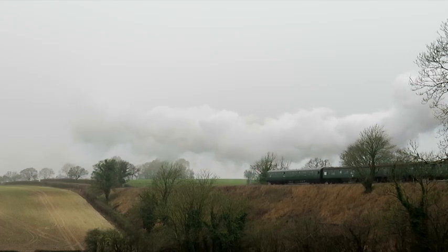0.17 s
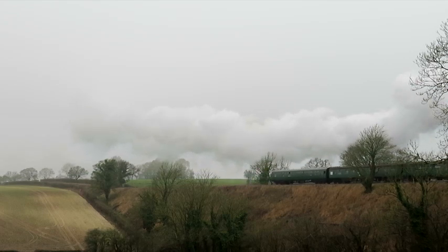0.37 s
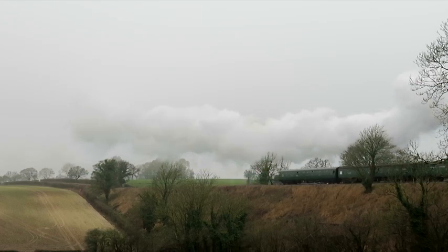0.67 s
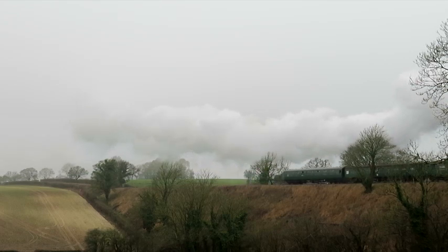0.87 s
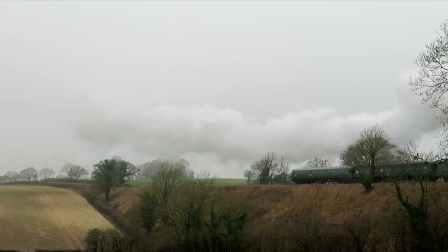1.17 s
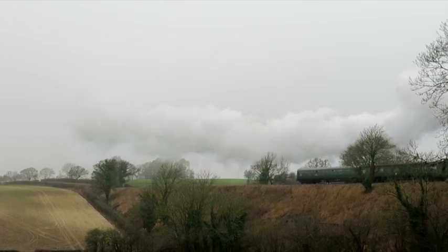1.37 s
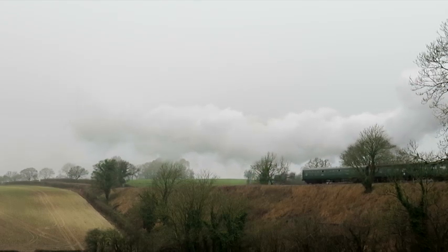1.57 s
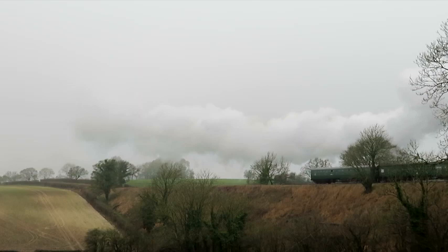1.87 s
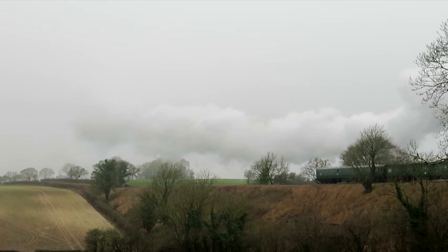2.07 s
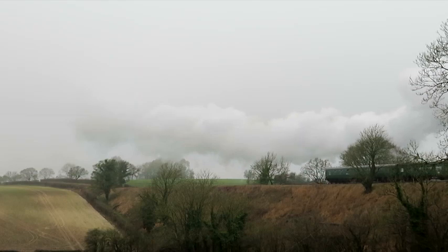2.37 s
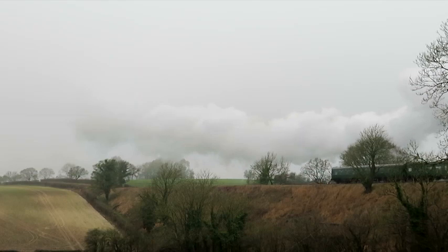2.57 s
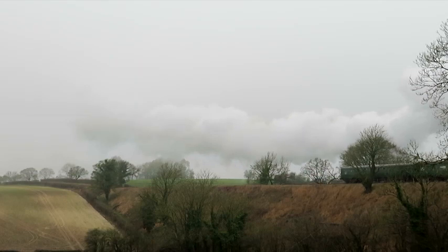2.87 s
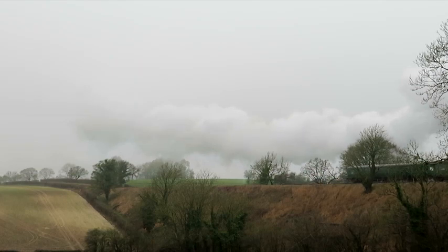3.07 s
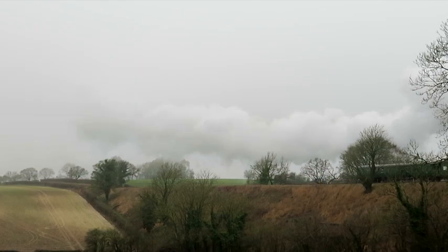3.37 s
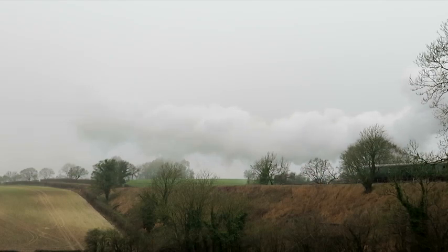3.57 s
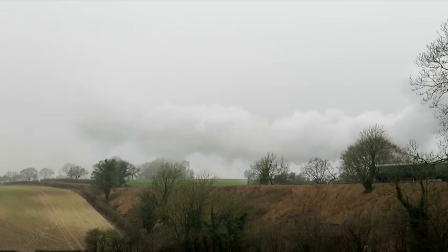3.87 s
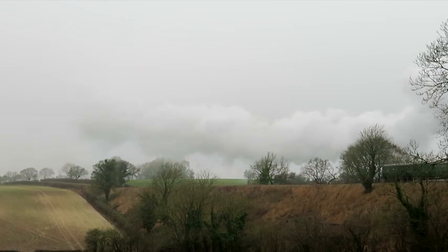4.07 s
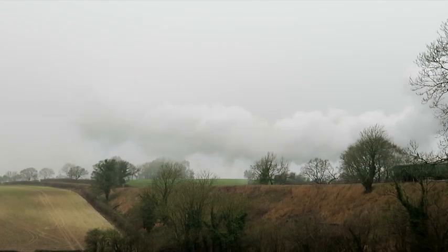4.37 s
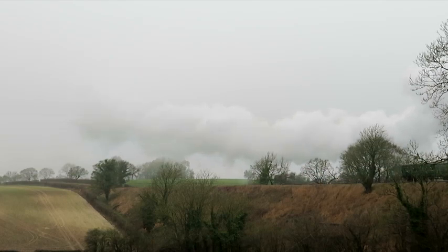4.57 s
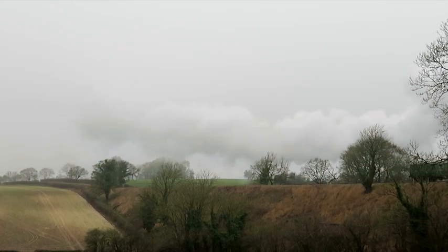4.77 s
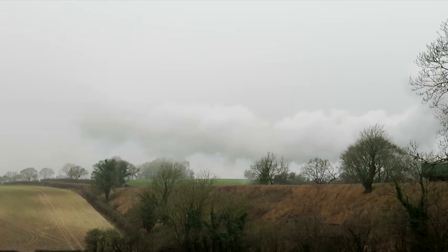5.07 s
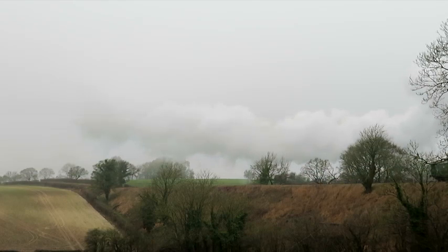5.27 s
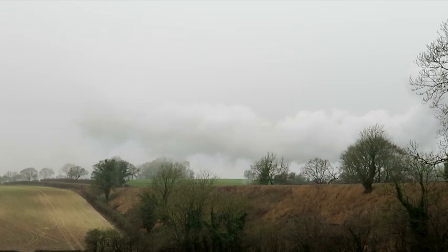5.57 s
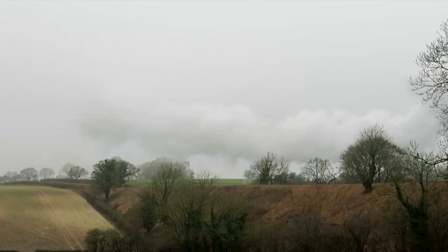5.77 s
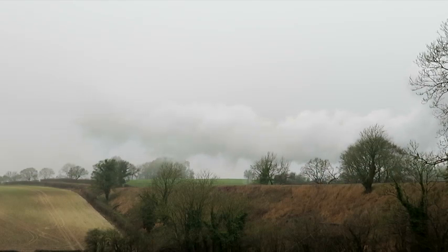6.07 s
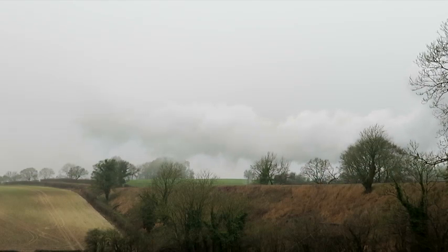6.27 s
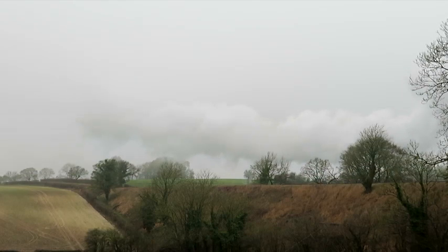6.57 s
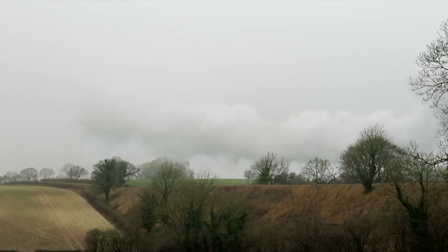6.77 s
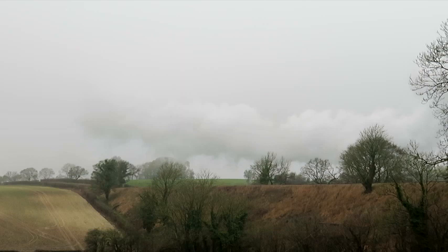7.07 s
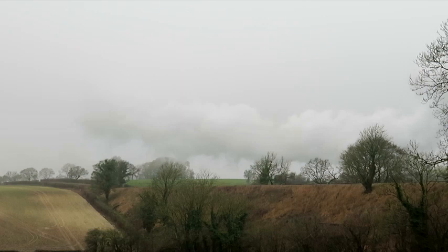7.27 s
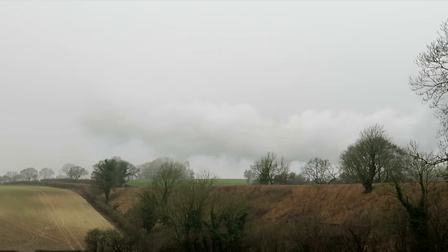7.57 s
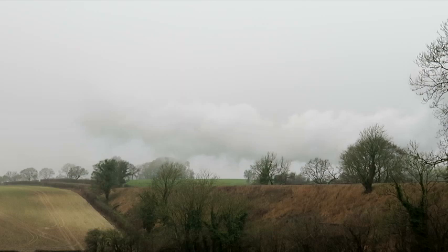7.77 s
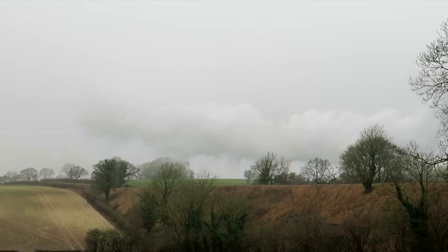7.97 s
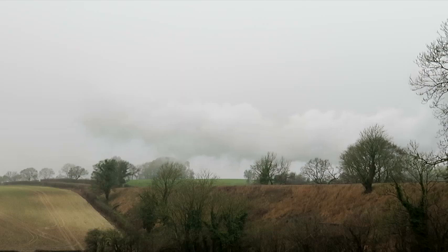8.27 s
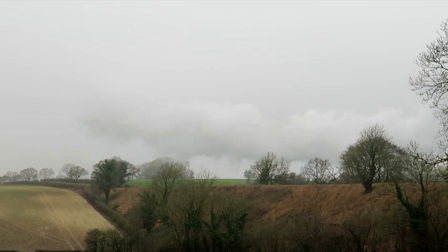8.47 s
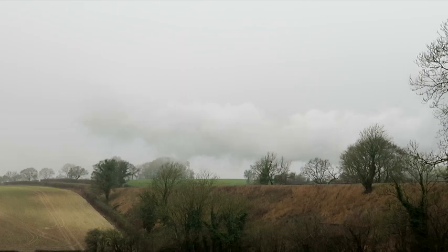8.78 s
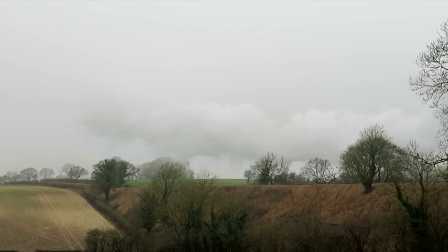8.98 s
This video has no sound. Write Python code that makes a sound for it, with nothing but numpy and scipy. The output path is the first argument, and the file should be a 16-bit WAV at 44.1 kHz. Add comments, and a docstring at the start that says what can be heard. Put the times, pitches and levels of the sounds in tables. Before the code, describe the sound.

Rapid, husky steam locomotive puffs, about seven a second, bark over low carriage rumble and gradually fade away across open fields.

```python
"""Steam exhaust beats, about seven a second, bark from a locomotive hauling its train off across open fields.
Each beat is a burst of jet noise in six bands, coloured by the chimney; hedges and banks dull it by turns. A
bounce off the ground and an echo from the fields follow the beats. Shaped noise makes the rumble and hiss of
the wheels and a low country hum; low booms and breathy whistles come and go among them. Left and right differ
in level and phase along the spectrum, with a phase step near 500 Hz. A small stereo camera microphone adds a
faint hiss."""
import sys
import numpy as np
from scipy import signal
from scipy.fft import rfft, irfft, next_fast_len
from scipy.io import wavfile
from scipy.ndimage import uniform_filter1d

SR = 44100
rng = np.random.default_rng(int(sys.argv[2]) if len(sys.argv) > 2 else 0)


def master_out(mix):
    """Clip the mix to full scale and print it as 16-bit PCM to the path in sys.argv[1]."""
    frames = np.transpose(np.atleast_2d(mix))
    ceiling = np.clip(frames, -1, 1)
    pcm = np.round(ceiling * 32767).astype(np.int16)
    wavfile.write(sys.argv[1], SR, pcm)


def level_to_linear(level):
    """Convert decibel levels to linear amplitude factors, elementwise."""
    exponent = np.asarray(level, float) / 20
    return 10 ** exponent


N = 402633  # samples
SIZE = next_fast_len(N)
HZ = np.maximum(np.arange(SIZE // 2 + 1) * SR / SIZE, 1)
TIME = np.arange(N) / SR  # s

# Low country hum. Each row: frequency in Hz, relative level in dB per Hz.
HUM_COLOUR = [(15, -8), (28, 1), (45, 9.5), (70, 13), (120, -4), (250, -47.5)]
# The hum rises and sinks. Each row: centre in seconds, length in seconds, change in dB.
HUM_SWELLS = [(0.1, .3, 3.5), (2.1, 0.35, 2.5), (4.4, .4, -2.5), (6.2, .7, 2.5), (8.1, .4, 2)]
HUM_DB = -37

# Echo off banks and hedges: level before dulling, decay by 60 dB, first return, dulling corner.
ECHO_DB, ECHO_T60_S, ECHO_DELAY_S, ECHO_TOP_HZ = -11.5, 0.94, 0.06, 1200

# The engine draws from abreast to behind the bank to open line and far off: the four moments in seconds.
STAGE_S = [0.96, 3.4, 5.8, 8.2]
# Rumble of the carriages. Each row: frequency in Hz, then relative level in dB per Hz at each of four stages.
RUMBLE_COLOURS = [(20, -34, -31, -28.5, -30), (40, -17, -14, -6, -11), (71, -6.5, -4.5, -4.5, -1),
                  (116, 0, 3, 0, 2), (150, -0.5, -1, 3, 4), (204, -2.5, -5.5, 1, -1.5),
                  (310, -8.5, -0.5, -7, -3), (390, -9.5, -1.5, -5.5, -5), (471, -8, -5, -10, -5.5),
                  (546, -15, -14.5, -14.5, -18.5), (896, -24, -21.5, -25, -21.5),
                  (1500, -70.5, -70, -71, -69)]
# The rumble swells and sinks now and then. Each row: centre in seconds, length in seconds, change in dB.
RUMBLE_SWELLS = [(0.203, 0.19, -1), (2.202, 0.42, 1), (2.7, 0.26, 1), (3.804, 0.33, 0.5), (4.45, 0.27, -1),
                 (5.304, 0.33, 2), (6.995, 0.098, -6), (7.55, .25, -0.5), (8.2, 0.31, 1.5)]
RUMBLE_DB, RUMBLE_LOSS_DB_PER_S = -24.5, 0.52  # at the start, lost as the carriages roll away

# Dull low booms in the rumble. Each row: start in seconds, length in seconds, level in dB, pitch in Hz.
BOOMS = [(0.123, 0.058, -27.5, 114), (2.052, 0.07, -20.5, 108.6), (2.419, 0.041, -21.5, 108),
         (2.757, .05, -25, 130.6), (3.04, .05, -23, 140), (3.699, 0.036, -26.5, 113),
         (4.14, 0.061, -28, 110), (5.115, 0.082, -22.5, 111.4)]

# Hiss of wheels on rails. Each row: frequency in Hz, relative level in dB per Hz.
HISS_COLOUR = [(300, -2), (550, 3), (1000, -6), (1400, -2), (1650, -5), (2050, -2.5), (2250, -8),
               (2700, -9.5), (3300, -13), (4200, -17.5), (5500, -23.5), (7000, -33.5), (10000, -62)]
# Broad rings of wheels and rails in it. Each row: centre in Hz, width in Hz, lift over the hiss in dB.
RAIL_RINGS = [(1005, 91, 9), (1290, 240, 4.5), (1950, 62, 0.5), (2452, 65, 6), (2625, 67, 4.5),
              (3110, 130, 4)]
# The top of the hiss swells and sinks with the air. Each row: centre in seconds, length in seconds, change in dB.
TOP_SWELLS = [(2.9, 0.27, 0), (3.7, .4, 1), (4.9, 0.21, -4.5), (6.0, 0.37, 0.5), (6.8, .3, -3),
              (8.2, 0.8, 1.5)]
HISS_DB, HISS_LOSS_DB_PER_S = -37.5, 0.76
TOP_DB, TOP_LOSS_DB_PER_S, TOP_FROM_HZ = -44.5, 0.97, 2180  # the top takes over from this pitch up

# A brighter wash rises in the hiss. Each row: centre in seconds, length in seconds, lift in dB.
WASH_SWELLS = [(5.6, 0.16, 8), (5.85, 0.093, 8.7), (6.2, 0.13, 8.6)]
WASH_HZ, WASH_WIDTH_HZ, WASH_DB = 2530, 380, -69

# Breathy whistles in the hiss. Each row: start and length in seconds, first and last pitch in Hz,
# level in dB of the breath that carries it.
WHISTLES = [(1.703, .45, 2054, 2020, -55), (2.645, 0.15, 2020, 2030, -57.5), (3.148, 0.46, 2134, 2070, -55),
            (5.764, .14, 2560, 2630, -54.5), (6.117, .25, 2360, 2650, -52.5),
            (7.452, 0.13, 3750, 3830, -63), (7.952, 0.57, 3010, 3180, -59), (8.8, 0.23, 3070, 3070, -63)]
WHISTLE_WIDTH_HZ = 60

# The bounce off the ground trails less once the engine clears the bank. Each row: time in seconds, mean lag in ms.
GROUND_LAG = [(0, 4.42), (2, 4.53), (4.1, 5.02), (4.7, 2.47), (7.3, 2.29), (9.13, 2.44)]
GROUND_DB, GROUND_DRIFT_MS = -10, 0.27

# Centres in Hz of the six parts of a beat: thud, thump, bark, roar, rasp, spray.
PART_HZ = [100, 200, 400, 740, 1500, 3600]
# How each part swells and dies before the stroke stretches it. Each row: rise in seconds, fall in seconds,
# time in seconds over which chance swings of the noise are evened out.
PART_SWELL = [(0.027, 0.04, 0.14), (0.036, 0.044, 0.038), (0.033, 0.041, .04), (0.027, 0.042, 0.037),
              (0.026, 0.041, 0.065), (0.018, 0.06, .08)]
# Colour of the steam jet. Each row: frequency in Hz, relative level in dB per Hz.
JET_COLOUR = [(40, -30.5), (90, -6.5), (160, -14), (260, -10.5), (480, -8.5), (540, -17), (1000, -17),
              (1500, -24.5), (2200, -33.5), (3500, -45), (6000, -58.5), (10000, -74)]
# Chimney resonances. Each row: centre in Hz, width in Hz, then lift over the jet in dB at each of four stages.
CHIMNEY = [(170, 33, 3, 3.5, 7.7, 7), (212.3, 36.5, 15.5, 18, 15, 10), (300.6, 15, 7.5, 9.5, 5.2, 6.5),
           (385, 99, 8.5, 12.5, 8.5, 3.1), (467, 78, 1.5, -3.5, 0.5, 4.5), (657, 350, 18, 5.5, 6.2, 2.6),
           (905, 350, -10, -0.5, 2, 4)]
# Exhaust beats, four to a wheel turn. Each row: time in seconds, bark in dB, thump over bark in dB,
# roar over bark in dB, rasp over roar in dB.
BEATS = [(0.008, -23, 4.5, -11.5, -5.5), (0.134, -24.5, 3.5, -5.5, -12.5), (0.277, -22, 0, -12.5, -7),
         (0.421, -23, -3, -6, -10.5), (0.554, -22.5, -3, -7.3, -7.1), (0.682, -24, 3, -1, -11),
         (0.82, -25.5, 2, -6, -8.5), (0.972, -25.5, 5, -3.5, -5.5), (1.107, -23, 1, -7.5, -5),
         (1.23, -24.5, 0.5, -8.5, -4.5), (1.37, -27.5, 2.5, -7.5, -6.5), (1.52, -26.5, 3, -6, -8.5),
         (1.663, -27.5, 3.5, -15, 0.8), (1.777, -29.5, 6, -10, 0), (1.92, -34.5, 9, -19, -5),
         (2.064, -29, 6.5, -17.5, 0.5), (2.207, -29.5, 2, -18.5, -0.5), (2.339, -30.5, -9, -17.5, -5.5),
         (2.469, -31, -1, -15, -3), (2.619, -31, 6, -11, -3.5), (2.753, -35, 6, -7, -4),
         (2.889, -37, 6.5, -5, -5.5), (3.021, -40, 7, -3.5, -5), (3.164, -35, 6, -7, -1),
         (3.307, -33, 6.5, -6.5, -6), (3.434, -29, 4.5, -12.5, -4.5), (3.571, -38, 9, -15.5, -4),
         (3.717, -29.5, 5, -10, -6.5), (3.855, -30, 2.5, -9, -8), (3.983, -26.5, -2.5, -13, -6.5),
         (4.12, -27.5, -2.5, -15.5, -0.5), (4.275, -25, -5, -13, -3), (4.407, -24.5, -4, -7.5, -8),
         (4.533, -31.5, 2.5, -2.5, -6.5), (4.676, -27.5, 2, -7, -10), (4.826, -28.5, -8, -3.5, -8.5),
         (4.961, -30, 3, -0.5, -6), (5.09, -31.5, 3.5, -2, -4.5), (5.225, -32, -2.5, -5, -1.5),
         (5.378, -30, 2.2, -0.5, -3), (5.517, -26.5, -0.3, -8, 0.5), (5.644, -28.5, -2, -8.5, 1.5),
         (5.784, -26.5, -5, -8.5, 0), (5.934, -29, 4.5, -1.5, -5.5), (6.075, -27.5, -3.5, -4.5, -3),
         (6.202, -31, 5, -4.5, -1.5), (6.343, -31.5, 3, -3.5, -2), (6.492, -28, 2.5, -2, -3.5),
         (6.628, -29.5, 8, -1, -3.5), (6.757, -24.5, -4.5, -10, 1.7), (6.897, -28, 0, -10.5, 2.5),
         (7.053, -25.5, -3, -8, -2.5), (7.184, -27.5, 3, -4, -5), (7.315, -27.5, -5, -10.5, -3.5),
         (7.453, -31.5, -1.5, -9, -0.5), (7.603, -28.5, -2.5, -14, 4), (7.743, -29, 0, -13, 3),
         (7.874, -29.5, -14, -14, 2.5), (8.014, -34.5, -4.5, -10.5, 1.7), (8.162, -36, -5, -6.5, 1.7),
         (8.306, -31.5, -6.5, -10.5, -2), (8.437, -33, 0.5, -8, -1), (8.576, -36.5, 3.5, -9.5, -1.5),
         (8.725, -38, 4, -3.5, -11.5), (8.861, -37, -2, -10, -1.5), (8.986, -36, -2.5, -8.5, -7),
         (9.13, -48.5, 2, -8, 1.5)]
# Peak of each part over its level in a beat, in dB: thump, bark, roar, rasp.
PART_PEAK_DB = [3.4, 2.1, 2.3, 2.2]
# The four strokes of a wheel turn blow for unequal times, as shares of the usual length.
STROKE_LENGTH = [1.01, 0.98, 1.04, 1.037]
PEAK_LEAD_S = 0.0067  # the burst peaks this long before the listed time
RISE_SHAPE, FALL_SHAPE = 3.35, 2.63  # larger = flatter top
# Thud under the thump and spray on top: dB at the start, dB lost per s, share taken of the
# ups and downs (0-1) of the thump for the thud and of the rasp for the spray.
THUD_DB, THUD_LOSS_DB_PER_S, THUD_SHARE = -28, 0.58, 0.46
SPRAY_DB, SPRAY_LOSS_DB_PER_S, SPRAY_SHARE = -44.5, 1.74, 0.4

# Likeness of left and right. Each row: frequency in Hz, correlation from 0 to 1.
ALIKE = [(30, .995), (480, .995), (540, .97), (1000, .975), (2000, .94), (3000, .86), (4500, .75),
         (7000, .62), (12000, .6)]
# Left and right differ in level and phase along the spectrum, with a phase step near 500 Hz.
# Each row: frequency in Hz, left minus right in dB, lead of the right in radians.
SIDES = [(30, -0.5, 0.17), (60, 0, 0.24), (110, 2.5, 0.31), (251, 0, 1.03), (493, -1.7, 1.16),
         (540, -2.5, 0.01), (1100, -5, .1), (2480, -3.5, 0.65), (5150, -2, 1.48), (8150, -0.5, 0.2)]
# Circuit hiss of the microphone. Each row: frequency in Hz, relative level in dB per Hz.
SELF_NOISE = [(1000, -5.5), (4000, 3.5), (8000, -2), (10500, -7.5), (12000, -24), (14000, -38.5)]
SELF_NOISE_DB = -65.5


def over_hz(table, column=1):
    """A table column along the spectrum, straight lines on log frequency."""
    rows = np.array(table, float)
    return np.interp(np.log(HZ), np.log(rows[:, 0]), rows[:, column])


def noise(gain):
    """Stereo noise of rms 1 with the given spectral gain, or one colouring per row; the sides share most of it."""
    alike = np.clip(over_hz(ALIKE), 0, 1)
    mid, side = rfft(rng.standard_normal((2, SIZE)))
    mid = mid * np.sqrt(1 + alike)
    side = side * np.sqrt(1 - alike)
    left_right = np.array([mid + side, mid - side])
    out = irfft(np.asarray(gain)[..., None, :] * left_right, SIZE)[..., :N]
    return out / np.sqrt(np.mean(out ** 2, axis=(-2, -1), keepdims=True))


def walk(rate):
    """Random levels held 1 / rate s and slewed twice; spread 1."""
    k = int(SR / rate)
    held = np.repeat(rng.standard_normal(N // k + 1), k)
    x = uniform_filter1d(uniform_filter1d(held, k), k)[:N]
    return x / np.std(x)


def bumps(table):
    """Sum of bell-shaped swells in dB."""
    return sum(db * np.exp(-((TIME - s) / length) ** 2) for s, length, db in table)


def peaked(gain, modes):
    """Lift a spectral gain around each resonance."""
    for hz, width, db in modes:
        gain = gain * (1 + (level_to_linear(db) - 1) / (1 + (2 * (HZ - hz) / width) ** 2))
    return gain


def steady(x, hold_s):
    """Even out the slow swings of a noise, keeping its grain."""
    power = uniform_filter1d(np.mean(x ** 2, axis=0), int(hold_s * SR))
    return x / np.sqrt(power)


def staged(gains):
    """One noise whose colour blends from each stage's gain to the next."""
    stages = np.arange(len(STAGE_S))
    shares = [np.interp(TIME, STAGE_S, stages == k) for k in stages]
    return sum(coloured * share for coloured, share in zip(noise(gains), shares))


def country_hum():
    """Low hum over the fields: bass noise that rises and sinks."""
    return level_to_linear(HUM_DB + bumps(HUM_SWELLS)) * noise(level_to_linear(over_hz(HUM_COLOUR)))


def fields(x):
    """Scattered, dull returns from banks and hedges, a little after each beat."""
    t = np.arange(int(ECHO_T60_S * SR)) / SR
    tail = rng.standard_normal(len(t)) * level_to_linear(-60 * t / ECHO_T60_S) * (t > ECHO_DELAY_S)
    tail = tail / np.sqrt(np.sum(tail ** 2))
    tail = signal.sosfilt(signal.butter(1, ECHO_TOP_HZ, fs=SR, output="sos"), tail)
    return level_to_linear(ECHO_DB) * signal.fftconvolve(x, tail[None], axes=1)[:, :N]


def rumble():
    """Low noise of the carriages, recoloured along the way, fading and flickering."""
    colours = [level_to_linear(over_hz(RUMBLE_COLOURS, column=k + 1)) for k in range(len(STAGE_S))]
    flicker_db = 1.1 * walk(5.6) + 1.6 * walk(14)
    level_db = RUMBLE_DB - RUMBLE_LOSS_DB_PER_S * TIME + bumps(RUMBLE_SWELLS) + flicker_db
    return steady(staged(colours), 0.22) * level_to_linear(level_db)


def booms():
    """A few soft cycles of bass, swelling and dying."""
    out = np.zeros(N)
    for s, length, db, hz in BOOMS:
        swell = np.exp(-((TIME - s - length / 2) / (length / 2)) ** 2)
        out += level_to_linear(db) * swell * np.sin(2 * np.pi * hz * (TIME - s))
    return out


def rail_hiss():
    """Wheels hissing on rails: ringing noise split in two, each half flickering and fading with distance."""
    colour = peaked(level_to_linear(over_hz(HISS_COLOUR)), RAIL_RINGS)
    top_share = 1 / (1 + (TOP_FROM_HZ / HZ) ** 4)
    hiss_db = HISS_DB - HISS_LOSS_DB_PER_S * TIME + 1.0 * walk(20)
    top_db = TOP_DB - TOP_LOSS_DB_PER_S * TIME + bumps(TOP_SWELLS) + 1.54 * walk(22)
    hiss = noise(colour * np.sqrt(1 - top_share)) * level_to_linear(hiss_db)
    top = noise(colour * np.sqrt(top_share)) * level_to_linear(top_db)
    return hiss + top


def wash():
    """A flat-topped band of noise that brightens the hiss as it swells."""
    band = np.exp(-((HZ - WASH_HZ) / WASH_WIDTH_HZ) ** 4)
    return noise(band) * level_to_linear(WASH_DB + bumps(WASH_SWELLS) + 1.3 * walk(15))


def whistles():
    """Narrow bands of noise carried on a gliding pitch."""
    out = np.zeros(N)
    for s, length, from_hz, to_hz, db in WHISTLES:
        u = np.clip((TIME - s) / length, 0, 1)
        breath = uniform_filter1d(rng.standard_normal(N), int(SR / WHISTLE_WIDTH_HZ))
        tone = np.sin(2 * np.pi * np.cumsum(from_hz + (to_hz - from_hz) * u) / SR)
        swell = np.sqrt(np.sin(np.pi * u).clip(0))
        out += level_to_linear(db) * swell * breath / np.std(breath) * tone
    return out


def train():
    """The rolling train: low rumble and booms under the thinner hiss, wash and whistles."""
    return rumble() + rail_hiss() + wash() + whistles() + booms()


def ground(x):
    """A second path off the ground cuts notches that slide as the engine recedes and waver with the air."""
    lag_ms = np.interp(TIME, *np.transpose(GROUND_LAG)) + GROUND_DRIFT_MS * walk(5)
    late = TIME - lag_ms / 1000
    return x + level_to_linear(GROUND_DB) * np.array([np.interp(late, TIME, side) for side in x])


def beats():
    """Time of every beat and the peak level in dB of its six parts."""
    s, bark, thump, roar, rasp = np.transpose(BEATS)
    levels = np.array([bark + thump, bark, bark + roar, bark + roar + rasp])
    thump, bark, roar, rasp = levels + np.array(PART_PEAK_DB)[:, None]
    thud = THUD_DB - THUD_LOSS_DB_PER_S * s + THUD_SHARE * (thump - np.mean(thump))
    spray = SPRAY_DB - SPRAY_LOSS_DB_PER_S * s + SPRAY_SHARE * (rasp - np.mean(rasp))
    return s, [thud, thump, bark, roar, rasp, spray]


def burst_power(peak_s, level_db, rise, fall):
    """Power of one part over time: each burst of steam swells and dies for as long as its stroke blows."""
    power = np.zeros(N)
    for at, db, length in zip(peak_s, level_db, np.resize(STROKE_LENGTH, len(peak_s))):
        near = slice(max(int((at - 0.15) * SR), 0), int((at + 0.3) * SR))
        t = (TIME[near] - at) / length
        shape = np.where(t < 0, RISE_SHAPE, FALL_SHAPE)
        power[near] += level_to_linear(2 * db) * np.exp(-np.abs(t / np.where(t < 0, rise, fall)) ** shape)
    return power


def exhaust(eddy_db=0.65, own_db=0.8):
    """Steam bursts through the chimney; eddies in the jet make every burst ragged."""
    jet = level_to_linear(over_hz(JET_COLOUR))
    colours = []
    for k in range(len(STAGE_S)):
        colours.append(peaked(jet, [(hz, width, db[k]) for hz, width, *db in CHIMNEY]))
    s, levels = beats()
    eddies = eddy_db * walk(110)  # common to all parts
    parts = np.arange(len(PART_HZ))
    out = 0
    for k, (level_db, (rise, fall, even_s)) in enumerate(zip(levels, PART_SWELL)):
        share = np.interp(np.log(HZ), np.log(PART_HZ), parts == k)
        jet_noise = steady(staged([colour * np.sqrt(share) for colour in colours]), even_s)
        power = burst_power(s - PEAK_LEAD_S, level_db, rise, fall)
        out = out + jet_noise * np.sqrt(power) * level_to_linear(eddies + own_db * walk(70))
    return out


def scene():
    """Beats, their echo and the rolling train over a low hum."""
    puffs = ground(exhaust())
    return puffs + fields(puffs) + train() + country_hum()


def roll_off(x):
    """The treble ends steeply here."""
    return signal.sosfilt(signal.butter(12, 12600, fs=SR, output="sos"), x)


def record(dry):
    """Left and right set apart over a faint circuit hiss; the loudest peaks are rounded, the start is eased in."""
    tilt = level_to_linear(over_hz(SIDES) / 2) * np.exp(-0.5j * over_hz(SIDES, column=2))
    hiss = level_to_linear(SELF_NOISE_DB) * noise(level_to_linear(over_hz(SELF_NOISE)))
    heard = irfft(rfft(dry, SIZE) * np.array([tilt, 1 / tilt]), SIZE)[:, :N]
    rounded = np.tanh(0.87 * heard) / 0.91
    ease_in = np.minimum(TIME / 0.0021, 1)
    return roll_off(rounded * ease_in + hiss)


dry = scene()
out = record(dry)
master_out(out)
```